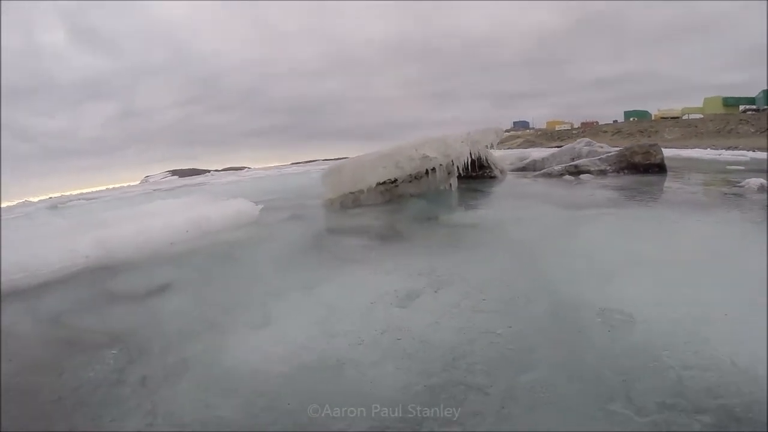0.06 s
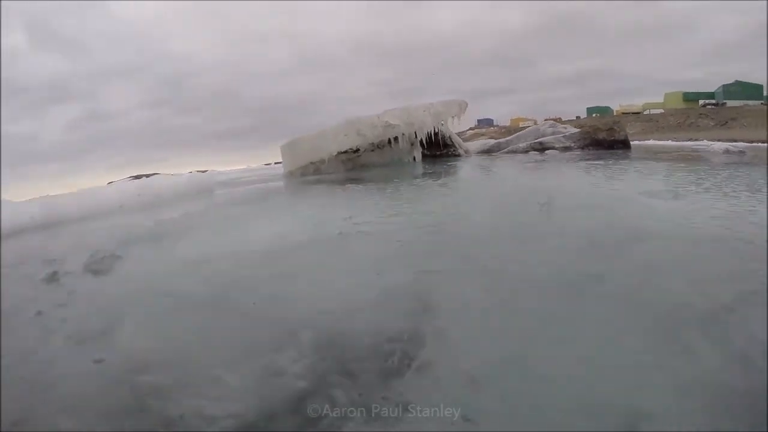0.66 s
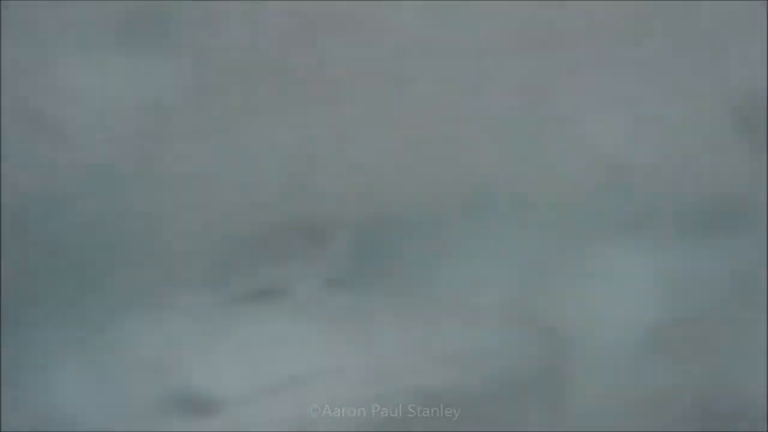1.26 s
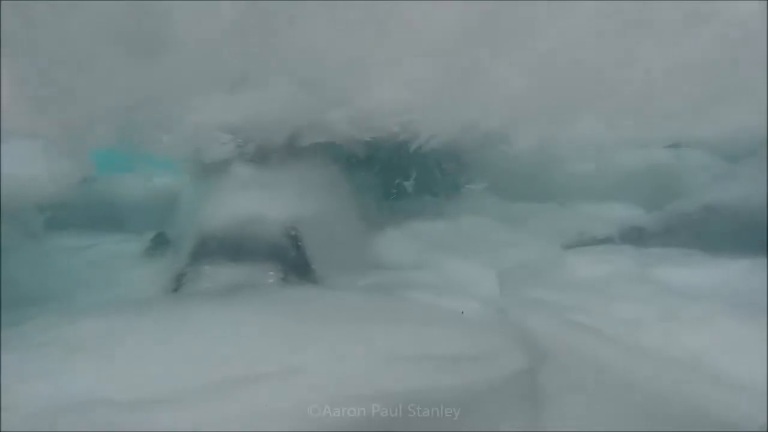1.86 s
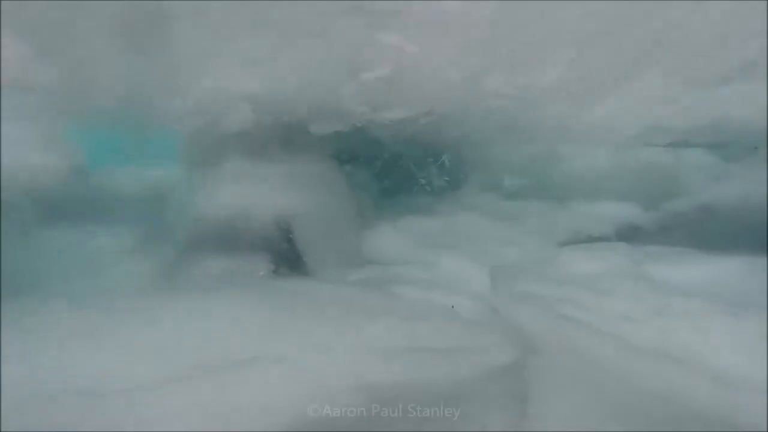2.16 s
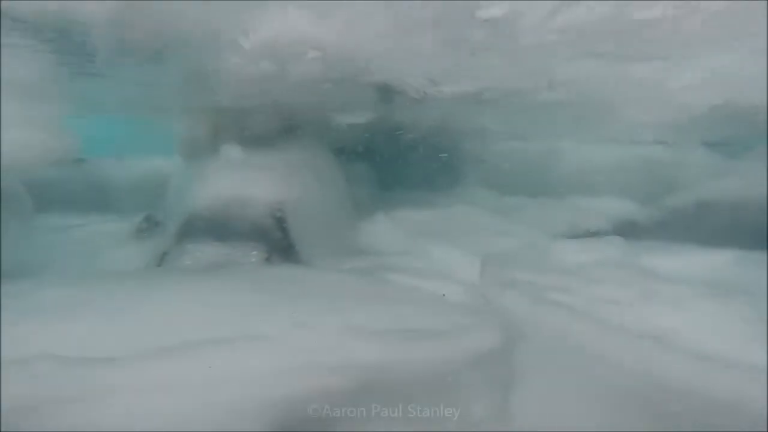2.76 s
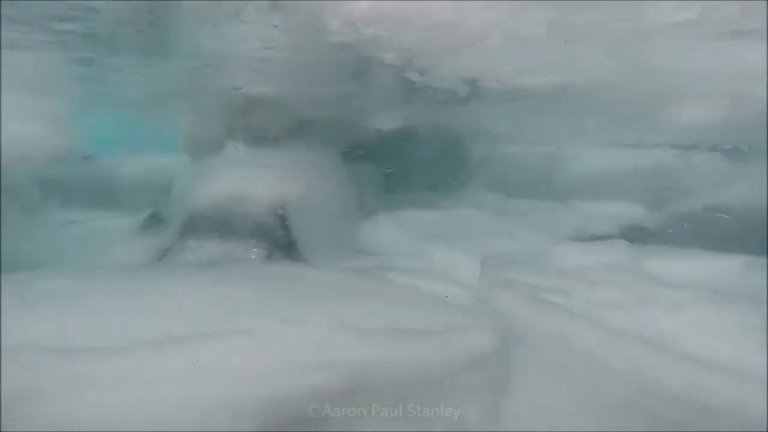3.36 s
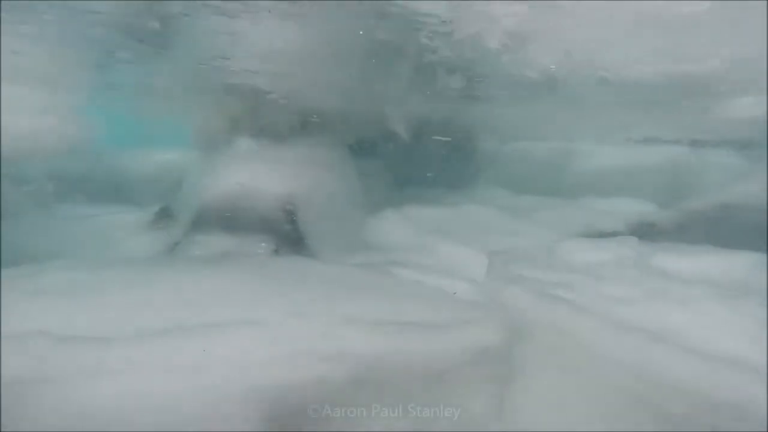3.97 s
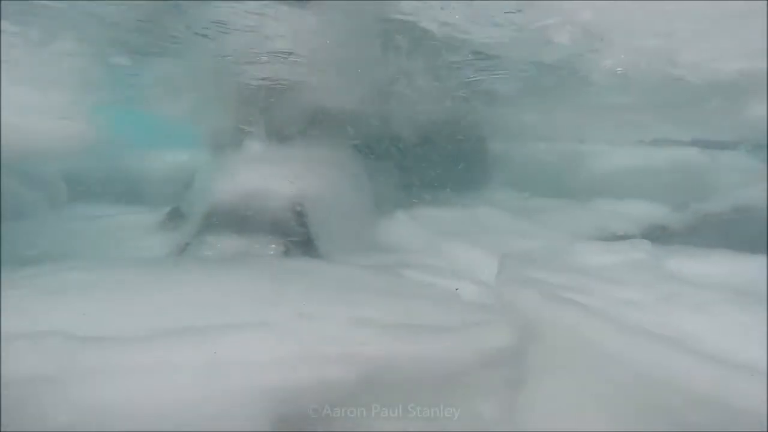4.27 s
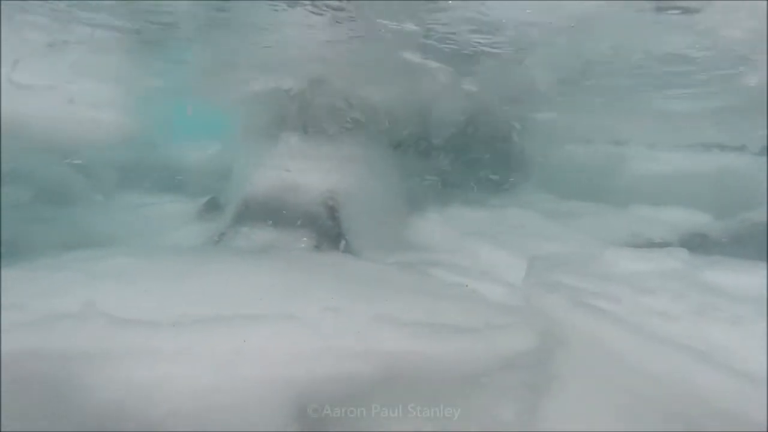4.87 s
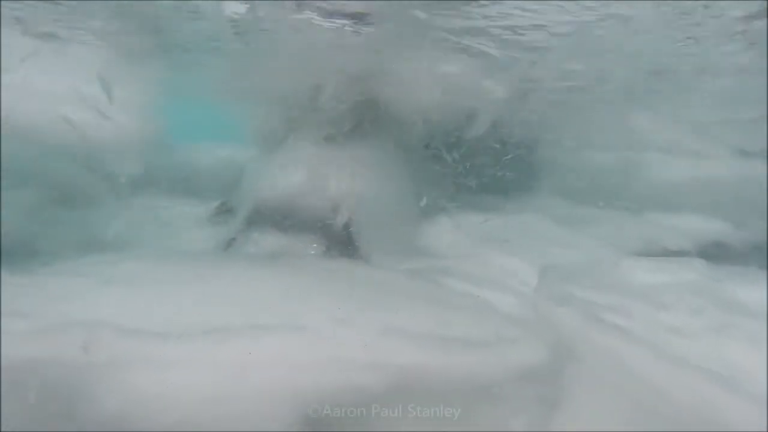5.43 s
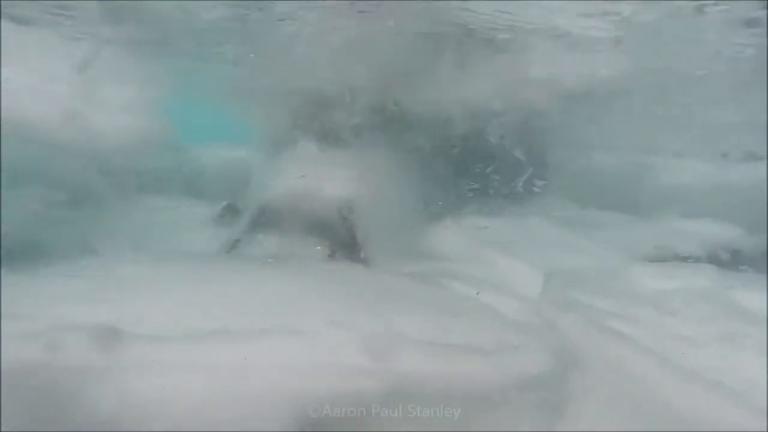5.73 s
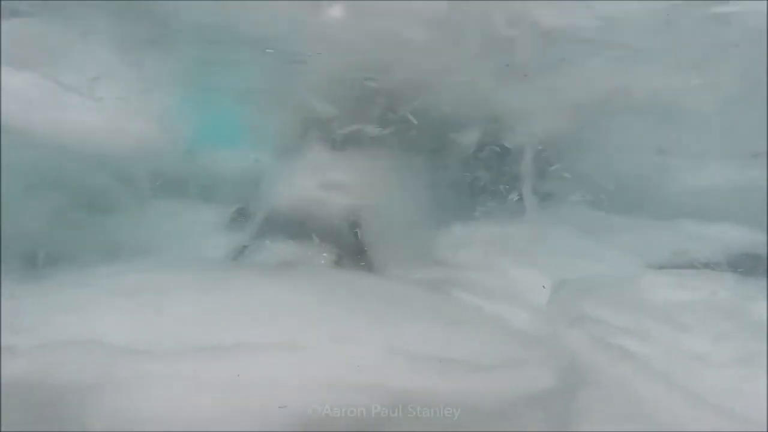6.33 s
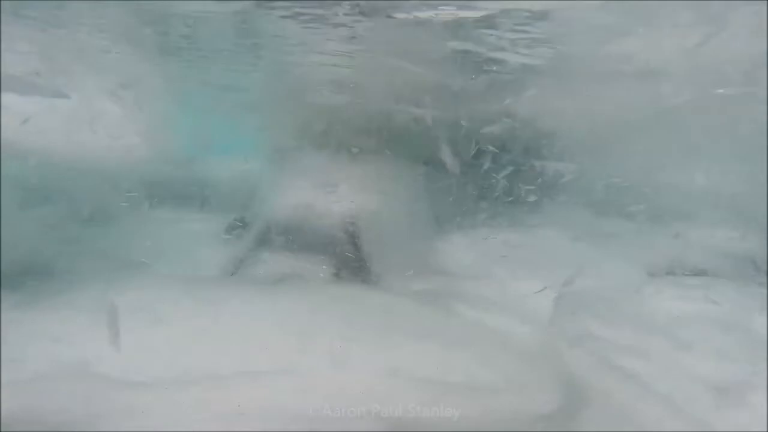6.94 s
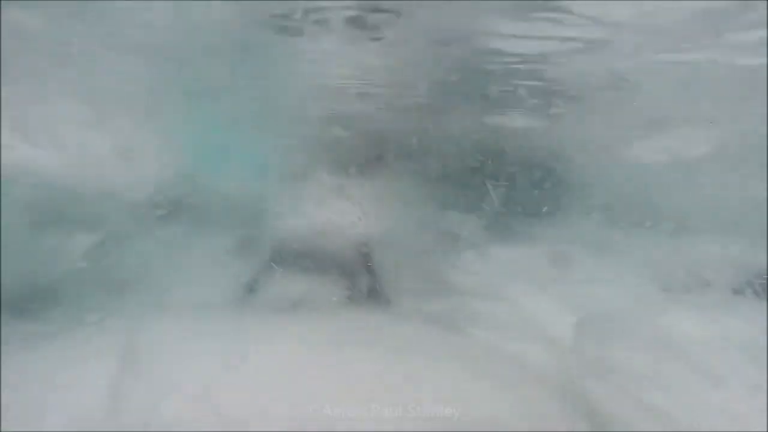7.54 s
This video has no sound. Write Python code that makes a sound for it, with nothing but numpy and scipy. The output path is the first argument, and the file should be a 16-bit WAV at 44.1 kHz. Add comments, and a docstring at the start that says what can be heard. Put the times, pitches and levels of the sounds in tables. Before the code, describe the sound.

Icy slush bumps against a waterproof case, which dips underwater with fizzing bubbles, followed by hollow ice knocks and scrapes.

```python
"""Icy slush knocks and scrapes on a waterproof camera case, heard from inside.
The case bumps about at the surface, then dips under at 1 s: air pockets pop, foam fizzes and fades.
Under water, trickling slush and stick-slip ice ring its hollow and thump its walls over a low rumble.
The ice grinds hard near 4.5 s and from 6.2 to 7.1 s; the slush seethes on to the end."""
import sys
import numpy as np
from scipy import signal
from scipy.fft import rfft, irfft
from scipy.io import wavfile
from scipy.ndimage import uniform_filter1d, minimum_filter1d

SR = 44100
rng = np.random.default_rng(int(sys.argv[2]) if len(sys.argv) > 2 else 0)


def pcm_store(signal):
    """Save signal as 16-bit PCM."""
    levels = np.round(np.clip(np.atleast_2d(signal), -1, 1) * 32767)
    wavfile.write(sys.argv[1], SR, levels.astype(np.int16).T)


N = 335160
TIME = np.arange(N) / SR
SPAN = 16384  # impulse response length, samples
TOP_HZ = 15550
DIP_S, DIP_ATTACK_S = 1.007, 0.012

# spectrum of crunching ice: freq_hz, gain_db
CRUNCH_SPECTRUM = [(200, 0.5), (550, -1), (1000, 1), (1800, 10), (2800, 7.5), (3500, -6), (4300, -1.5),
                   (5500, -2), (7200, -5.5), (10000, -15), (13500, -23), (16000, -27.5)]


def undb(db):
    """Decibels to gain."""
    return 10 ** (np.asarray(db) / 20)


def unit(x):
    """Scale to rms 1."""
    return x / np.sqrt(np.mean(x ** 2))


def gains(curve):
    """Per-sample gain for each dB column of a time curve."""
    time_s, *columns = np.transpose(curve)
    return [undb(np.interp(TIME, time_s, db)) for db in columns]


def add(out, start_s, x):
    """Mix x into out."""
    i = max(0, int(start_s * SR))
    out[i:i + len(x)] += x[:max(0, N - i)]


def through(x, response):
    """Convolve, keeping the length of x."""
    return signal.fftconvolve(x, response)[:len(x)]


def colour(spectrum):
    """Minimum-phase impulse response of a spectrum."""
    hz, db = np.transpose(spectrum)
    bins_hz = np.maximum(np.fft.rfftfreq(SPAN, 1 / SR), 1)
    magnitude = undb(np.interp(np.log(bins_hz), np.log(hz), db))
    cepstrum = irfft(np.log(magnitude))
    cepstrum[1:SPAN // 2] *= 2
    cepstrum[SPAN // 2 + 1:] = 0
    return irfft(np.exp(rfft(cepstrum)))


def walk(rate_hz):
    """Ramps between random levels, rms 1."""
    step = int(SR / rate_hz)
    held = np.repeat(rng.standard_normal(N // step + 1), step)
    return unit(uniform_filter1d(held, step)[:N])


def grains(rate_hz, spread_db, size=N):
    """Random impulses, many small, a few large."""
    chance, strength, sign = rng.random((size, 3)).T
    rarity = -np.log(np.maximum(strength, .025))
    return (chance < rate_hz / SR) * undb(spread_db * rarity) * np.sign(sign - .5)


def ring(force, modes):
    """A force rings damped modes, each with a set share of the energy."""
    t = TIME[:SPAN // 4]
    hz, width_hz, db = np.transpose(modes)[:, :, None]
    responses = np.exp(-np.pi * width_hz * t) * np.sin(2 * np.pi * hz * t)
    rung = signal.oaconvolve(force[None], responses, axes=1)[:, :len(force)]
    return unit(np.sum(undb(db) * np.sqrt(width_hz) * rung / rung.std(axis=1, keepdims=True), axis=0))


def wall_thud(force):
    """The walls bend slowly and follow only the low part of a force."""
    # bending modes: freq_hz, width_hz, level_db
    wall_modes = [(42, 18, -26), (79, 54, -29), (101.2, 14.6, 7), (124.5, 14.7, 11.5), (177, 120, -3.5),
                  (208, 9.1, -7)]
    return unit(signal.sosfilt(signal.butter(3, 215, fs=SR, output="sos"), ring(force, wall_modes)))


def swell(rumble_db=-1, hiss_db=-63):
    """Moving water buffets the walls and rumbles, over faint microphone hiss."""
    # water pushing on the case: time_s, flutter_db, rumble_db
    push_levels = [(0, -49.5, -38), (.95, -52, -43), (1.9, -44.5, -46), (2.4, -51.5, -52.5),
                   (4.0, -50.5, -45.5), (4.35, -37, -42), (5.0, -31, -35), (5.3, -40.5, -40.5),
                   (5.65, -38, -36), (6.0, -43, -41.5), (6.28, -30, -32), (6.42, -43, -46),
                   (7.05, -36.5, -53), (7.25, -55, -44), (7.6, -53.5, -60)]
    # noise spectra: freq_hz, gain_db
    rumble_spectrum = [(10, -24), (28, 9.5), (45, -3.5), (70, -4), (150, -42.5), (400, -29), (1000, -56)]
    hiss_spectrum = [(100, -9), (300, 12), (700, 5.5), (1100, 3.5), (3000, -3.5), (4600, -10), (5150, -1.5),
                     (6500, -13), (9000, -15), (10100, -4), (11500, -30), (15000, -54)]
    flutter_gain, rumble_gain = gains(push_levels)
    flutter = wall_thud(grains(rate_hz=100, spread_db=4))
    rumble = unit(through(rng.standard_normal(N), colour(rumble_spectrum)))
    hiss = unit(through(rng.standard_normal(N), colour(hiss_spectrum)))
    return flutter * flutter_gain + rumble * rumble_gain * undb(rumble_db) + hiss * undb(hiss_db)


def bumps(rise_s=0.0027, decay_s=0.011, knock_hz=660, knock_s=0.0084, tick_s=0.0044):
    """Soft blows bend the wall in two low modes, after a faint tick and a hollow knock."""
    # blows: start_s, level_db, pitch_hz
    blows = [(.139, -32.5, 146), (.234, -23, 125), (.37, -29.5, 133), (.532, -16.5, 125), (.625, -30, 120),
             (0.814, -25, 127), (1.015, -27.5, 109), (2.469, -28.5, 86), (2.561, -26, 130),
             (4.532, -6, 106.3), (4.717, -10.5, 77), (4.778, -17.5, 96), (4.98, -16.5, 93),
             (5.192, -18, 87), (5.406, -17.5, 81), (5.594, -19.5, 102), (5.836, -16.5, 121)]
    out, crunch, t = np.zeros(N), colour(CRUNCH_SPECTRUM), TIME[:SPAN // 2]
    turn, rise = 2 * np.pi * t, 1 - np.exp(-t / rise_s)
    for start_s, db, hz in blows:
        wall = (np.sin(turn * hz) + undb(-7) * np.sin(turn * hz * 1.63)) * np.exp(-t / decay_s)
        knock = undb(-24) * np.sin(turn * knock_hz) * np.exp(-t / knock_s)
        tick = undb(-34) * unit(through(rng.standard_normal(len(t)), crunch)) * np.exp(-t / tick_s)
        add(out, start_s, (wall * rise ** 2 + knock * rise + tick) * undb(db))
    return out


def bubble(hz, cycles, glide):
    """A bubble rings down to 1/e in `cycles`; its pitch rises by the fraction `glide`."""
    age = 1 - np.exp(-TIME[:SPAN // 8] * hz / cycles)
    return (1 - age) * np.sin(2 * np.pi * np.cumsum(hz * (1 + glide * age)) / SR)


def chirps(pitch_hz=3200, detune=.09, scatter_db=5):
    """Tiny bubbles of nearly one size escape from the melting ice."""
    # spells of bubbles: start_s, length_s, rate_hz, level_db
    spells = [(0.179, .36, 24, -55), (5.522, .28, 12, -48.5)]
    out = np.zeros(N)
    for start_s, length_s, rate_hz, db in spells:
        for when, pitch, strength in rng.random((int(length_s * rate_hz), 3)):
            note = bubble(pitch_hz * (1 + detune * (2 * pitch - 1)), cycles=16, glide=0.077)
            add(out, start_s + length_s * when, note * undb(db + scatter_db * (strength - .5)))
    return out


def onset(full_s):
    """Quick rise from silence, complete at full_s."""
    return np.clip(1 + (TIME - full_s) / DIP_ATTACK_S, 0, 1) ** 2


def foam_envelope(level_db=-33, fade_db_per_s=14.5, gush_db=0, gush_decay_s=0.066):
    """Foam fades steadily after the dip; each gush stirs it up briefly."""
    # water folding over the case: start_s, level_db
    gushes = [(1.005, -20), (1.172, -31), (1.444, -27), (1.93, -48.5)]
    fading = onset(DIP_S) * undb(level_db - fade_db_per_s * np.abs(TIME - DIP_S))
    gushing = sum(onset(start_s) * undb(db + gush_db) * np.exp(-np.abs(TIME - start_s) / gush_decay_s)
                  for start_s, db in gushes)
    return np.hypot(fading, gushing)


def bubble_cloud(spectrum, top_rate_hz, spread_db, cycles, flicker_db=2.5):
    """Bubbles of 14 sizes ring briefly, each size in its own spurts, small ones more often."""
    cloud, t = 0, TIME[:SPAN // 8]
    for hz in np.geomspace(300, 15000, 14):
        ping = np.exp(-t * hz / cycles) * np.sin(2 * np.pi * hz * t)
        births = grains(top_rate_hz * np.sqrt(hz / TOP_HZ), spread_db) * undb(flicker_db * walk(55))
        cloud = cloud + np.sqrt(hz) * unit(through(births, ping))
    return unit(through(cloud, colour(spectrum)))


def foam(gurgle_db=2.5, gurgle_hz=28):
    """Foam closes over the case: bubbles, crackle and fine spray die away."""
    # foam spectra: freq_hz, gain_db
    bubble_spectrum = [(150, -2.5), (400, -8.5), (600, -4), (1000, -12.5), (1280, 1), (1750, 2.5),
                       (2500, 3), (3000, -6), (4500, -32), (9000, -26)]
    spray_spectrum = [(1500, -38), (3300, 3.5), (4600, -2), (6000, 4.5), (7500, -4), (11000, -11),
                      (14500, -23), (16000, -104)]
    crackle = unit(through(grains(rate_hz=1100, spread_db=6.5), colour(bubble_spectrum)))
    body = bubble_cloud(bubble_spectrum, top_rate_hz=1200, spread_db=4, cycles=2.8)
    spray = bubble_cloud(spray_spectrum, top_rate_hz=1100, spread_db=3.8, cycles=1.6)
    spray_gain = foam_envelope(level_db=-36, fade_db_per_s=20, gush_db=-8.5)
    fizz = foam_envelope() * (undb(-2) * body + undb(-4) * crackle) + spray_gain * spray
    return fizz * undb(gurgle_db * walk(gurgle_hz))


def pops(snap_s=0.0012, highpass_hz=1000):
    """Air pockets burst in the slush: a thin snap and a short wet note."""
    # bursts: start_s, note_db, pitch_hz, snap_db
    bursts = [(1.0076, -4.5, 1580, -26.5), (1.033, -9.5, 1220, -15.5), (1.1089, -8.5, 2570, -37),
              (1.2183, -6.5, 2100, -17), (1.2475, -13, 2160, -23), (1.444, -11, 1510, -29),
              (1.524, -6.5, 3150, -20), (1.524, -9.5, 4520, -34.5), (1.6158, -11, 11500, -17),
              (1.829, -9, 1187, -27), (1.868, -17.5, 10100, -26), (1.8854, -17, 6670, -29),
              (2.081, -23, 9200, -37.5), (7.227, -23, 2350, -41), (7.5654, -15, 2000, -30)]
    out, t = np.zeros(N), TIME[:SPAN // 8]
    highpass = signal.butter(2, highpass_hz, "highpass", fs=SR)
    thin_crunch = signal.lfilter(*highpass, colour(CRUNCH_SPECTRUM))
    for start_s, note_db, hz, snap_db in bursts:
        note = bubble(hz, cycles=6, glide=0.012)
        snap = unit(through(rng.standard_normal(len(t)), thin_crunch)) * np.exp(-t / snap_s)
        add(out, start_s, note * undb(note_db - 6) + snap * undb(snap_db + 6))
    return out


def plinks(count=170, length_s=1.6, lowest_hz=1150, spread_db=4, tilt_db_per_decade=-7):
    """Clear single bubbles rise out of the foam, many faint, a few strong."""
    out, foam_gain = np.zeros(N), foam_envelope()
    for when, decades, strength in rng.random((count, 3)):
        start_s = DIP_S + length_s * when
        rarity = -np.log(max(strength, .04))
        gain = foam_gain[int(start_s * SR)] * undb(spread_db * rarity + tilt_db_per_decade * decades)
        add(out, start_s, bubble(lowest_hz * 10 ** decades, cycles=6, glide=0.037) * gain)
    return out


def hollow_ring(force):
    """The hollow case rings, muffled by the water around it."""
    # submerged case modes: freq_hz, width_hz, level_db
    case_modes = [(670, 120, -6.5), (777, 45, 3.5), (958, 78, 4), (1100, 74, -23), (1309, 75, 8),
                  (1487, 104, 7.5), (1700, 25, 1), (1890, 81, 2), (2121, 150, 1), (2410, 61, -1.5),
                  (3450, 110, -12), (4260, 510, -17), (5330, 310, -19.5), (6270, 110, -11.5)]
    band = signal.butter(2, [600, 8500], "bandpass", fs=SR, output="sos")
    return unit(signal.sosfilt(band, ring(force, case_modes)))


def trickle(surge_db=5, grit_db=-22):
    """Small crystals patter on the case in uneven surges."""
    # slush flow along the case: time_s, level_db
    flow_levels = [(1.0, -96), (1.3, -40), (1.9, -38), (2.3, -55), (2.62, -55.5), (2.85, -44.5),
                   (3.1, -53.5), (4.05, -54.5), (4.45, -48.5), (4.9, -52.5), (5.45, -53.5), (5.95, -60.5),
                   (6.35, -49), (7.2, -50.5), (7.6, -42.5)]
    patter = grains(rate_hz=1400, spread_db=2) * undb(surge_db * walk(45))
    grit = unit(through(patter, colour(CRUNCH_SPECTRUM)))
    return (hollow_ring(patter) + grit * undb(grit_db)) * gains(flow_levels)[0]


def chip(contact_s, ring_db, crunch_db):
    """One ice chip hits: a brief crumbling contact rings the case."""
    t = TIME[:SPAN // 4]
    force = rng.standard_normal(len(t)) * np.exp(-t / contact_s)
    body = hollow_ring(force)
    crunch = through(force, colour(CRUNCH_SPECTRUM))
    return body / np.abs(body).max() * undb(ring_db) + crunch / np.abs(crunch).max() * undb(crunch_db)


def flurries(contact_s=0.00063, scatter_db=5, crisp_db=4):
    """Small chips arrive unevenly, some duller, some crisper."""
    # spells of chips: start_s, length_s, rate_hz, level_db, crunch_db
    spells = [(1.899, .7, 16, -33.5, -2), (4.1, 2.2, 15, -50.5, 8), (6.821, .36, 40, -39.5, 15)]
    out = np.zeros(N)
    for start_s, length_s, rate_hz, db, crunch_db in spells:
        draws = 2 * rng.random((int(length_s * rate_hz), 3)) - 1
        for k, (jitter, strength, crisp) in enumerate(draws):
            tick = chip(contact_s, -crisp_db * crisp, crunch_db + crisp_db * crisp)
            add(out, start_s + (k + .5 + jitter / 2) / rate_hz, tick * undb(db + scatter_db * strength))
    return out


def scrapes(slip_rate_hz=1600, spread_db=2.5, chatter_db=3, chatter_hz=220, release_s=0.0023):
    """Ice sticks and slips on the case: each run of slips crunches, rings it and bends its walls."""
    # strokes, short and hard or long and light: start_s, length_s, force_db
    strokes = [(2.382, 0.017, -41.5), (2.776, 0.066, -45), (3.452, 0.076, -41), (4.274, 0.066, -38),
               (4.454, 0.082, -28), (4.4715, 0.0066, -16.5), (4.4917, 0.013, -9), (4.515, 0.0146, -14),
               (4.561, .065, -38.5), (6.118, 0.035, -34), (6.17, .12, -36.5), (6.256, 0.014, -27),
               (6.273, .012, -18), (6.481, .014, -20), (6.502, 0.086, -29), (6.519, 0.01, -15),
               (6.626, 0.15, -32), (6.689, 0.09, -29), (6.718, 0.032, -20), (6.861, 0.02936, -33.5),
               (6.914, 0.02, -34), (6.983, 0.042, -39), (7.04, 0.02, -21), (7.061, .11, -37)]
    # ice contact, wet at first, brittle at the end: time_s, crunch_db, thud_db
    hardness = [(2.4, -7, -9), (3.5, -20.5, -4.5), (4.3, -22, 2), (4.49, -29, -13.5), (4.56, -14.5, 9),
                (6.12, -13, 10.5), (6.28, -8, 7), (6.63, -12, 0.5), (6.69, 0.5, 1.5), (7.1, -0.5, 2)]
    out, crunch, t = np.zeros(N), colour(CRUNCH_SPECTRUM), TIME[:SPAN // 2]
    crunch_gain, thud_gain = gains(hardness)
    grip = undb(chatter_db * walk(chatter_hz))
    for start_s, length_s, force_db in strokes:
        i = int(start_s * SR)
        contact = np.exp(-np.maximum(t - length_s, 0) / release_s) * grip[i:i + len(t)]
        slips = grains(slip_rate_hz, spread_db, size=len(t)) * contact
        slips[0] += 0.52 * undb(spread_db)  # first slip breaks the grip
        cracks = slips * np.abs(slips) ** 0.16  # hardest slips break crystals
        edge = unit(through(cracks, crunch)) * crunch_gain[i] * undb(7)
        corner_hz = min(14200 * crunch_gain[i] ** 0.71, TOP_HZ)  # wetter ice slips more softly
        push = signal.lfilter(*signal.butter(1, corner_hz, fs=SR), slips)
        body = hollow_ring(push) + wall_thud(slips) * thud_gain[i]
        add(out, start_s, (edge + body) * undb(force_db) * np.sqrt(length_s / t[-1]))
    return out


def taps():
    """Larger chips hit the case one by one."""
    # hits: start_s, level_db, crunch_db
    hits = [(2.609, -25.5, -23), (2.872, -20, -5.5), (3.162, -29, -19), (3.616, -23.5, -25),
            (4.277, -17.5, -17), (4.622, -14.5, -43), (4.784, -16, -13.5), (4.979, -20, -28),
            (5.192, -18.5, -14.5), (5.425, -29.5, -2), (5.63, -25.5, -5), (6.211, -16, -0.5),
            (6.481, -28, -11), (6.692, -12, -7), (6.759, -10, -4), (6.769, -9.5, -17), (6.831, -28, 6.5),
            (6.859, -25.5, 7), (6.871, -28, 12), (6.984, -8.5, -25)]
    out = np.zeros(N)
    for start_s, db, crunch_db in hits:
        add(out, start_s, chip(contact_s=0.00086, ring_db=-3, crunch_db=crunch_db + 3) * undb(db))
    return out


def seethe(flicker_db=1.2):
    """Loose wet crystals rustle past the case, swelling at the end."""
    # rustle strength: time_s, level_db
    rustle_levels = [(6.8, -63), (6.86, -38.5), (7.15, -42), (7.2, -49.5), (7.34, -44.5), (7.45, -35),
                     (7.6, -46)]
    # slush spectrum: freq_hz, gain_db
    slush_spectrum = [(150, -10.5), (350, -20.5), (530, 0.5), (660, -8), (780, -5.5), (1050, -17),
                      (1300, -12), (2400, -10), (3100, -24.5), (4000, -18.5), (7000, -30), (11500, -36.5),
                      (14500, -38), (16000, -45)]
    rustle = grains(rate_hz=2200, spread_db=3.8) * undb(flicker_db * walk(70))
    return unit(through(rustle, colour(slush_spectrum))) * gains(rustle_levels)[0]


def scene():
    """Ice, air and water reach one microphone inside the case."""
    ice = scrapes() + taps() + flurries() + bumps()
    air = pops() + foam() + plinks() + chirps()
    water = trickle() + seethe() + swell()
    return (ice + air + water)[None]


def record(dry):
    """A limiter holds down the loudest ice scrapes; a steep low-pass cuts the top."""
    ceiling, hold = .88, int(.002 * SR)
    needed_gain = ceiling / np.maximum(np.abs(dry), ceiling)
    gain = uniform_filter1d(minimum_filter1d(needed_gain, hold), hold)
    lowpass = signal.ellip(10, .2, 80, TOP_HZ, fs=SR, output="sos")
    return signal.sosfilt(lowpass, dry * gain)


dry = scene()
out = record(dry)
pcm_store(out)
```